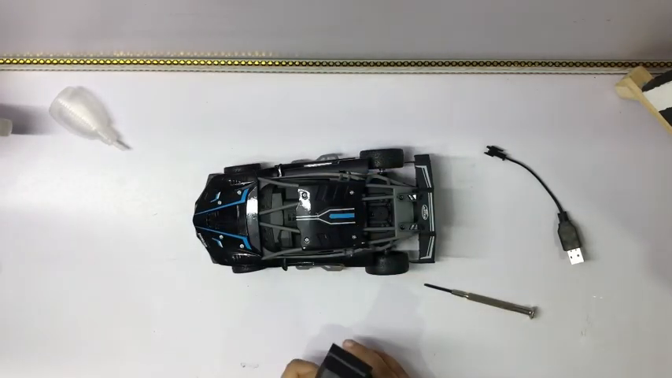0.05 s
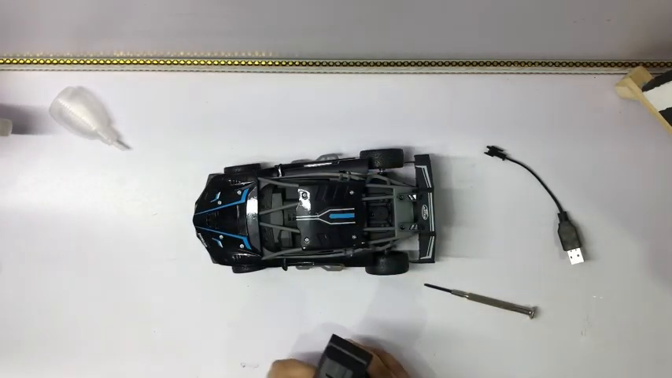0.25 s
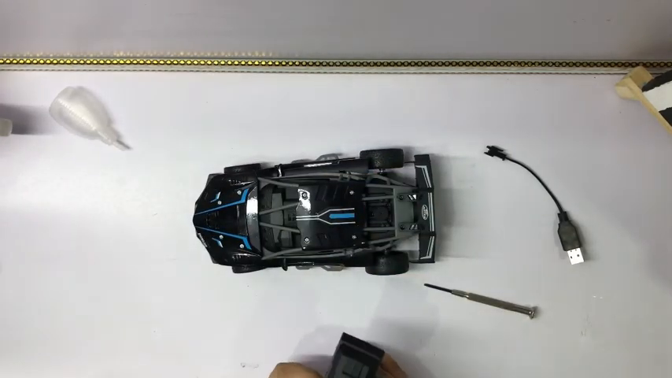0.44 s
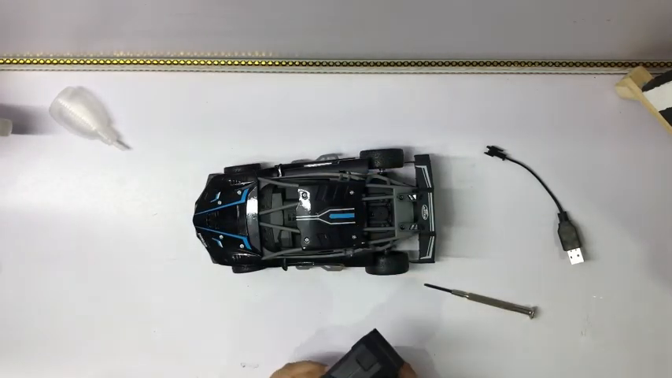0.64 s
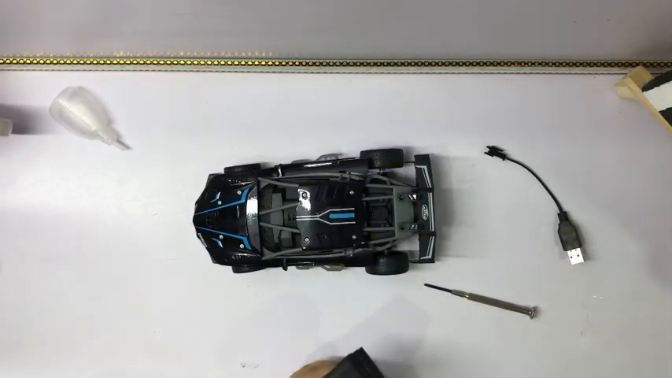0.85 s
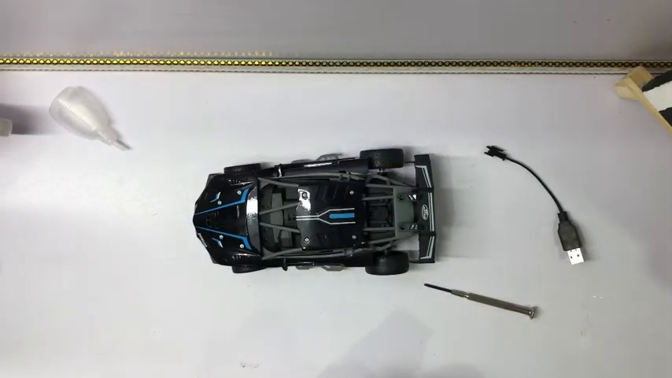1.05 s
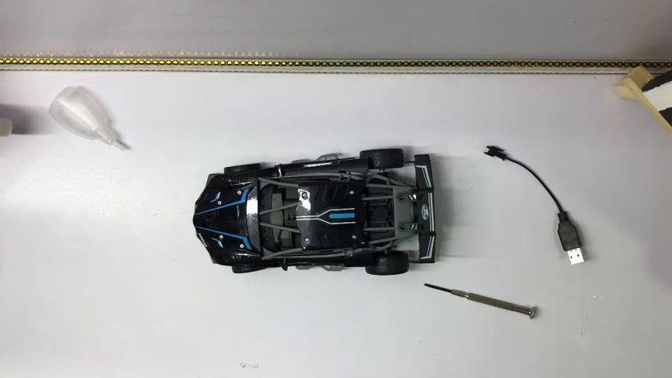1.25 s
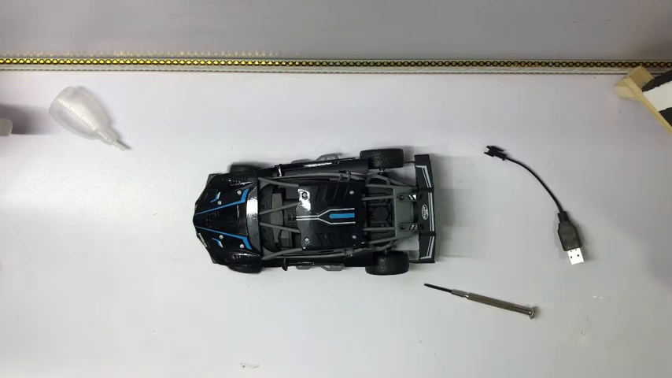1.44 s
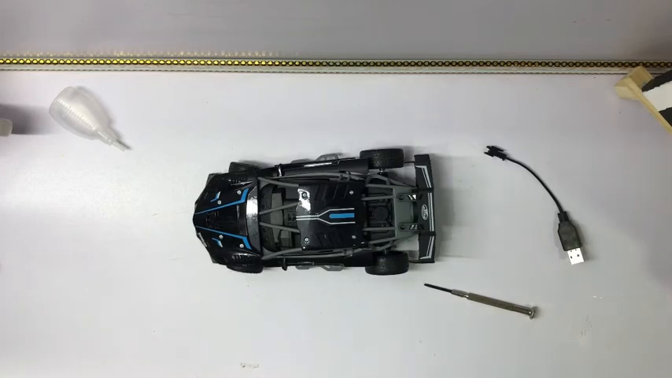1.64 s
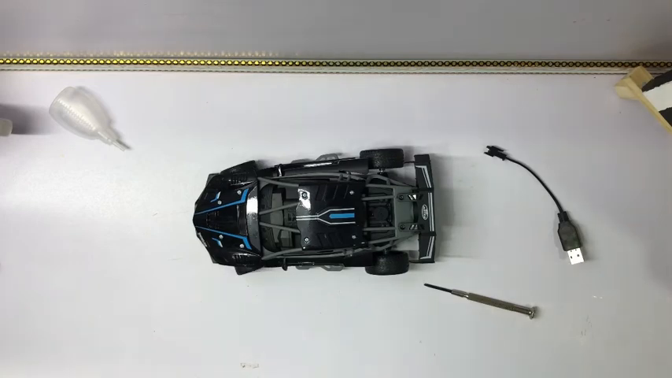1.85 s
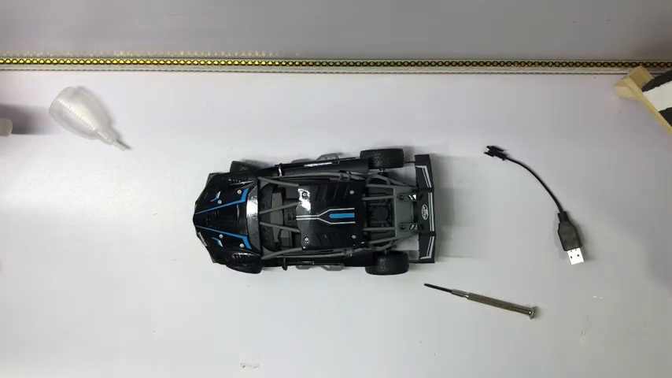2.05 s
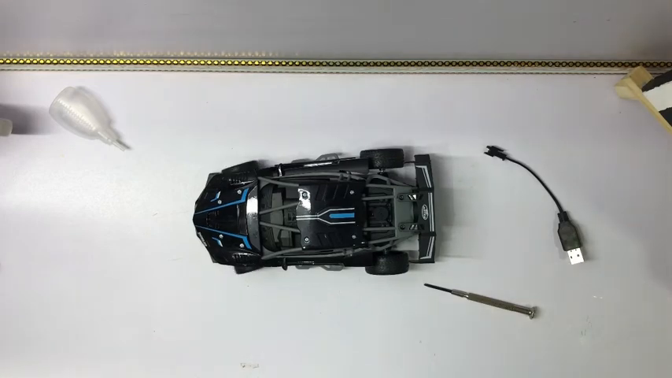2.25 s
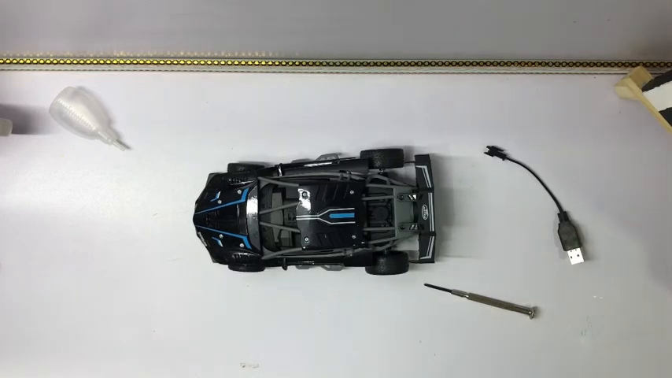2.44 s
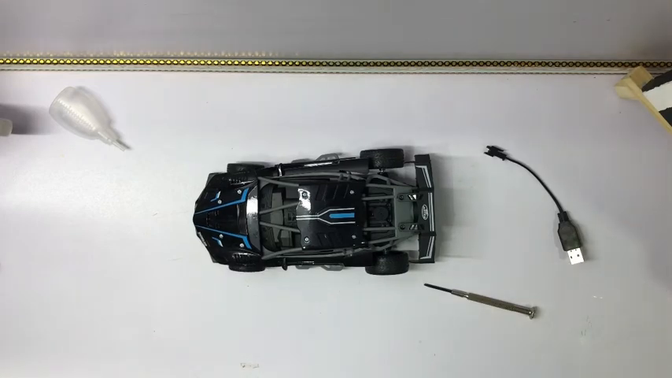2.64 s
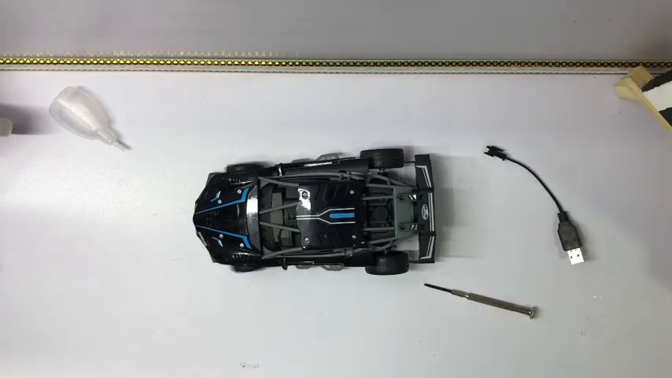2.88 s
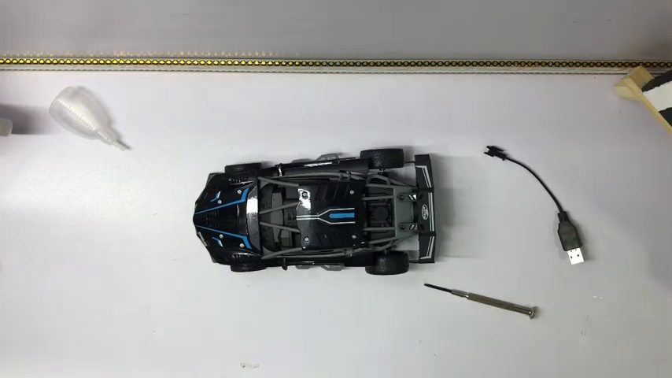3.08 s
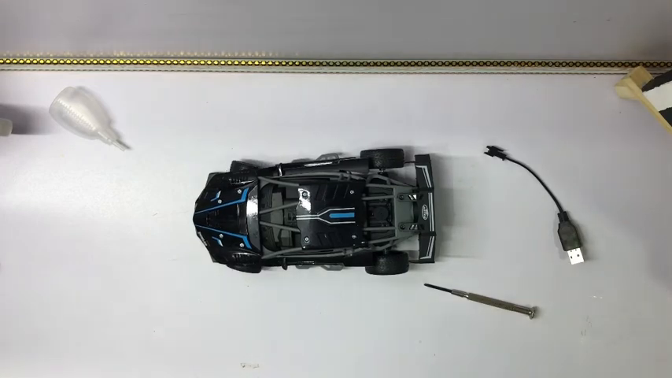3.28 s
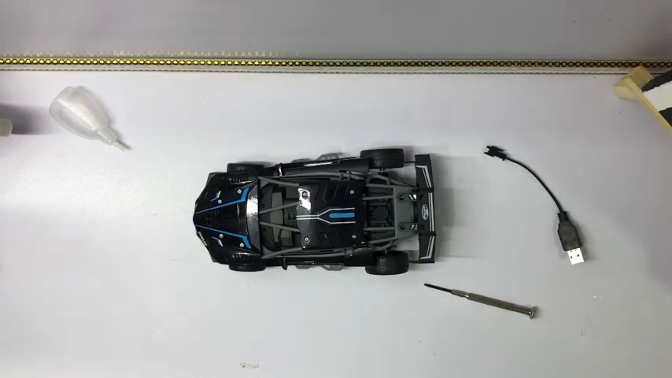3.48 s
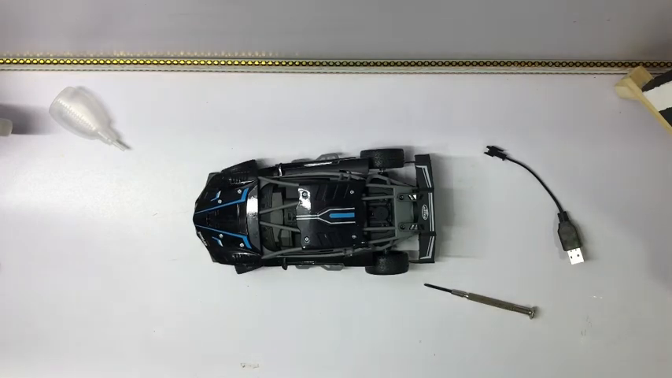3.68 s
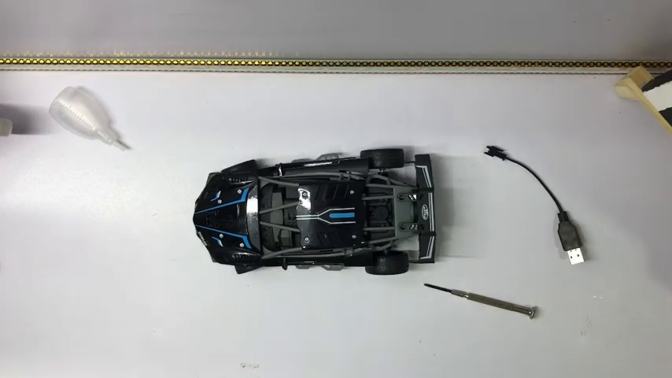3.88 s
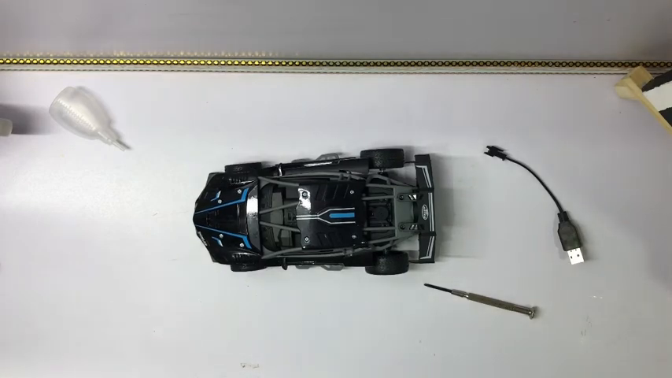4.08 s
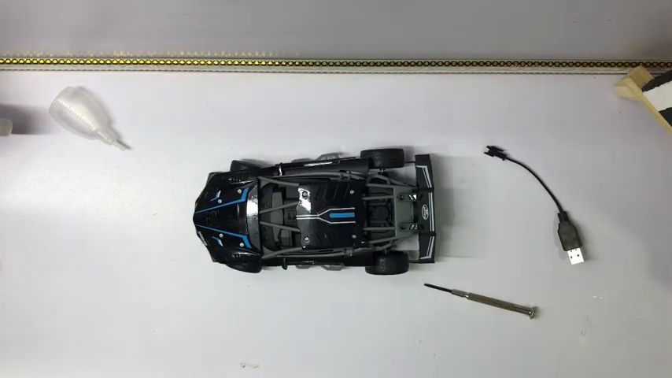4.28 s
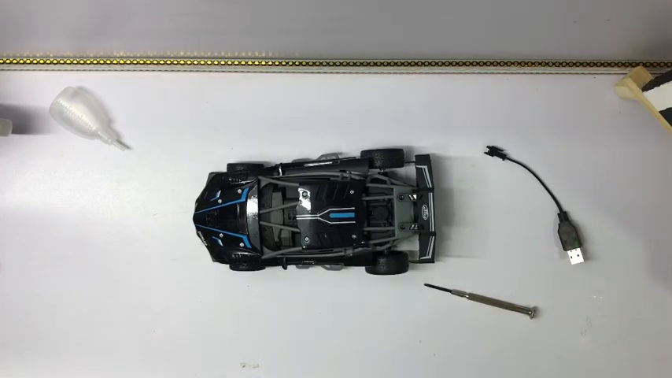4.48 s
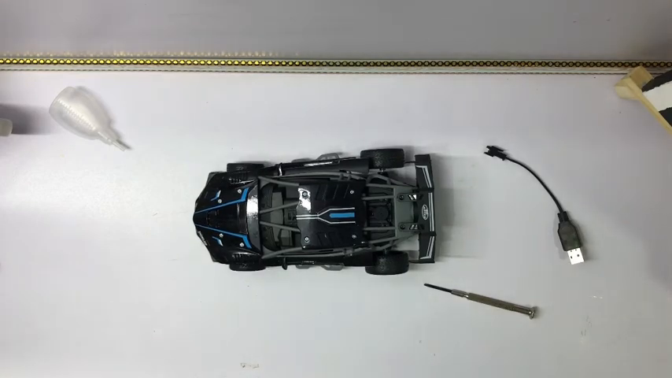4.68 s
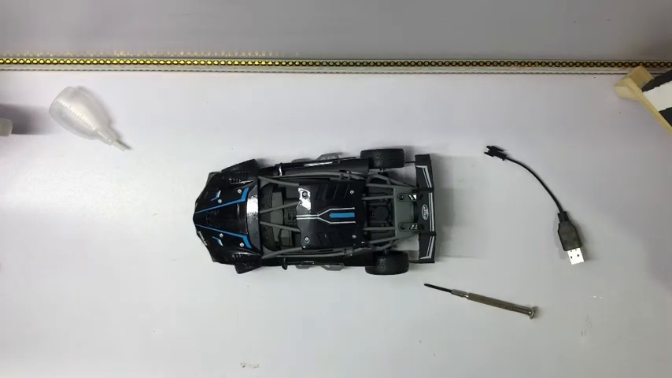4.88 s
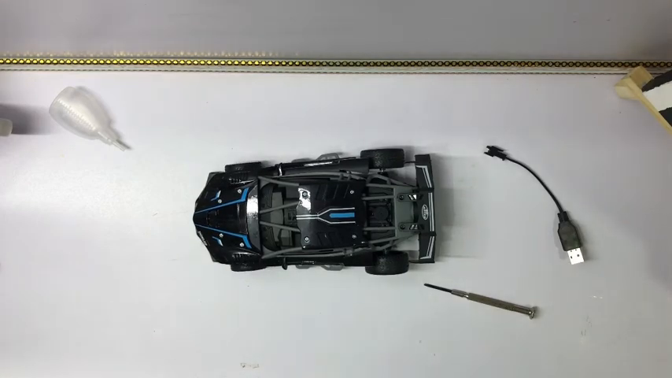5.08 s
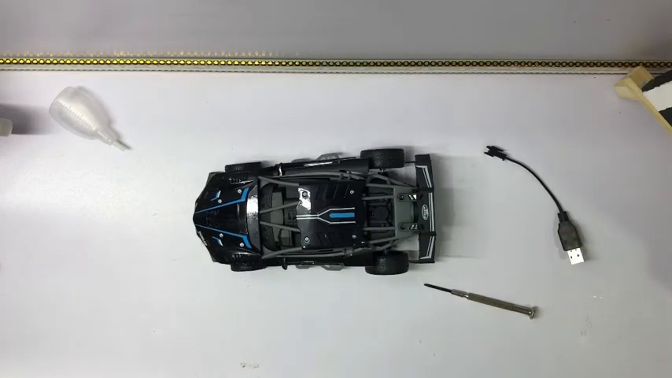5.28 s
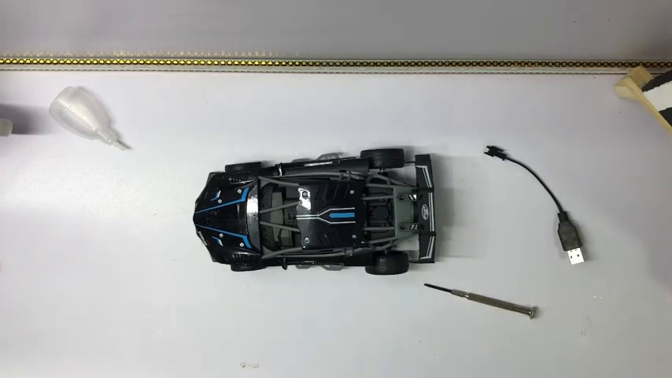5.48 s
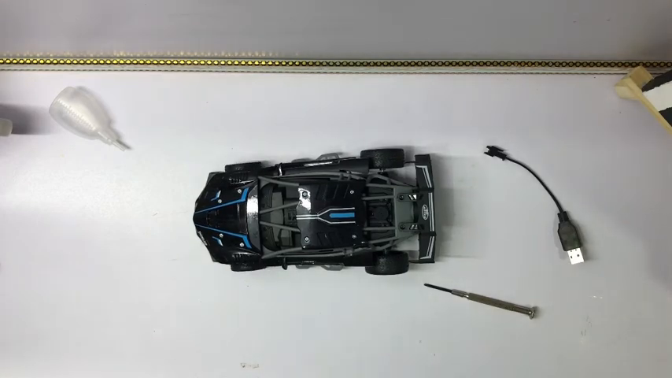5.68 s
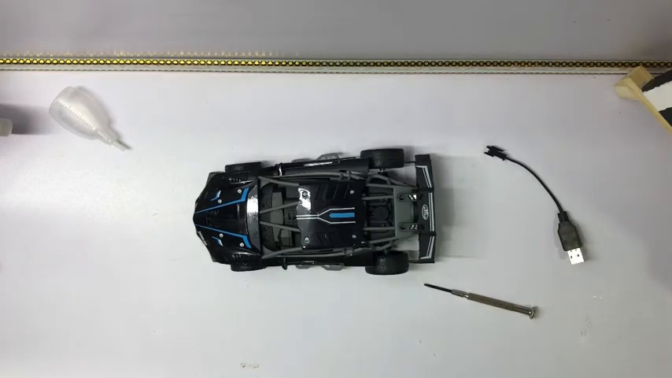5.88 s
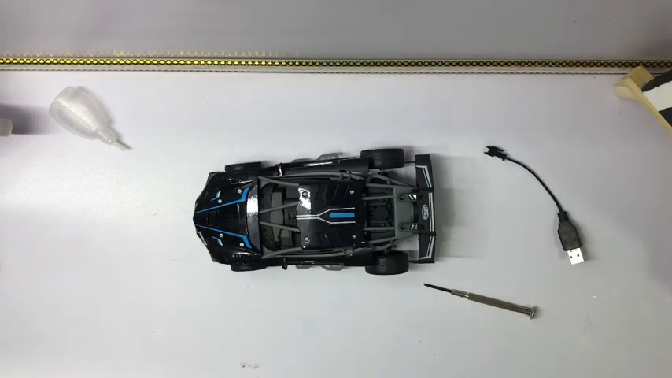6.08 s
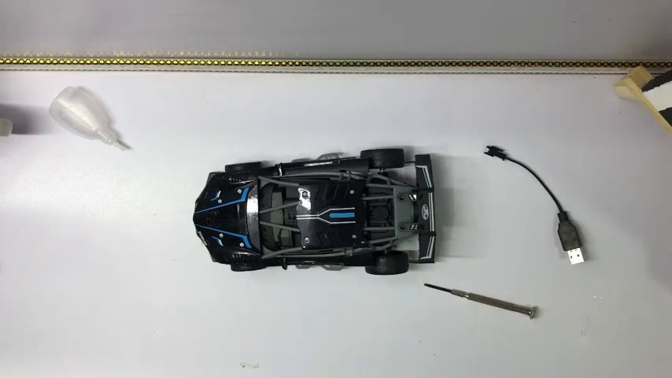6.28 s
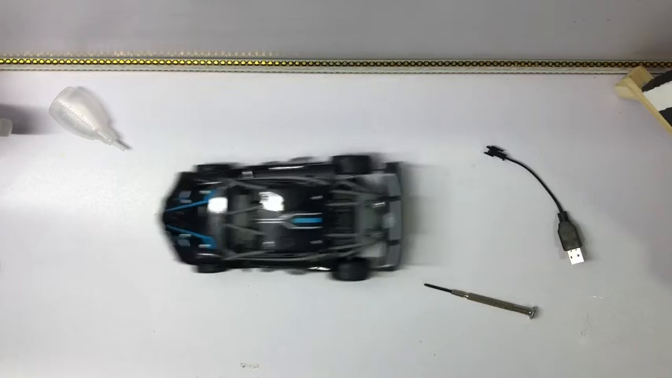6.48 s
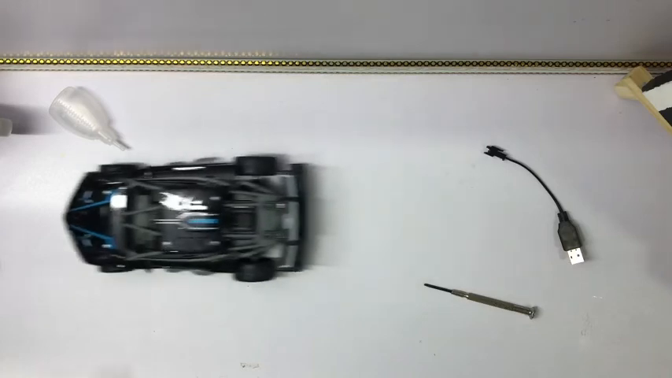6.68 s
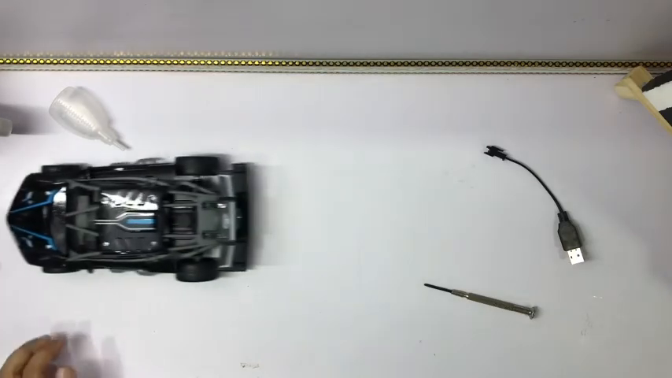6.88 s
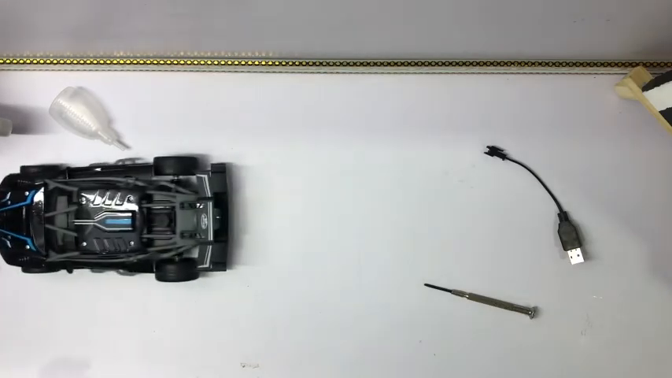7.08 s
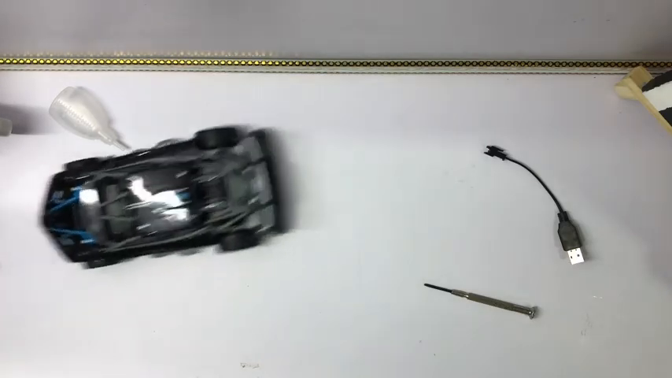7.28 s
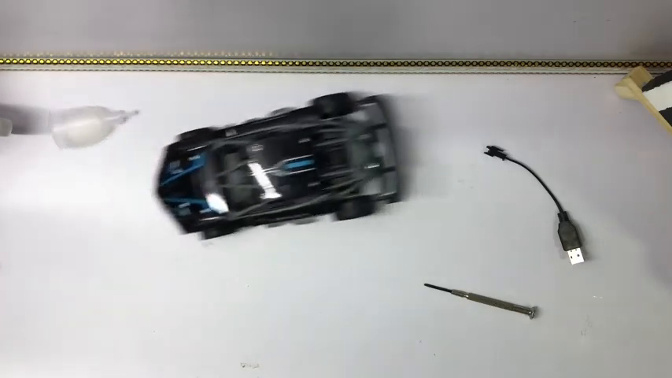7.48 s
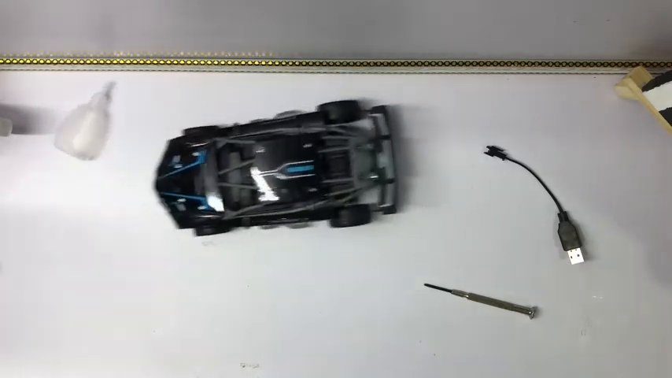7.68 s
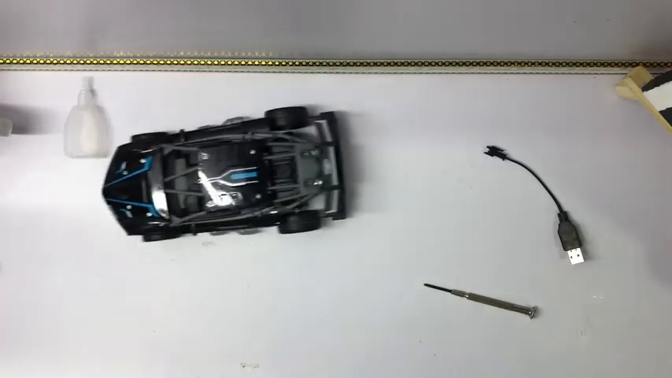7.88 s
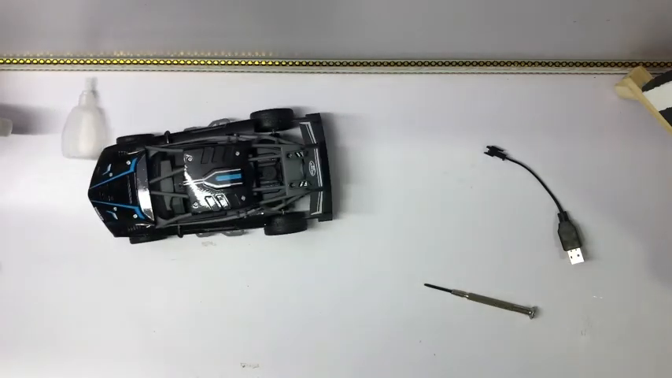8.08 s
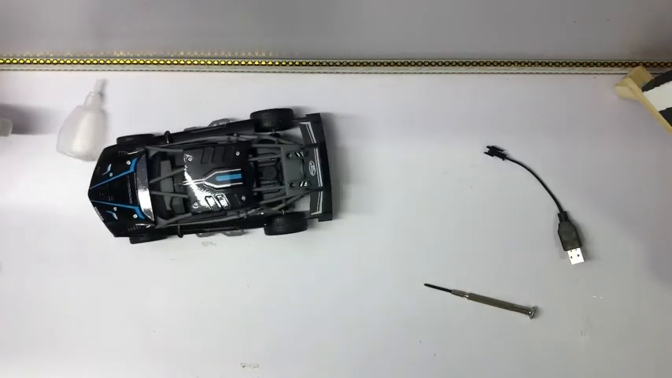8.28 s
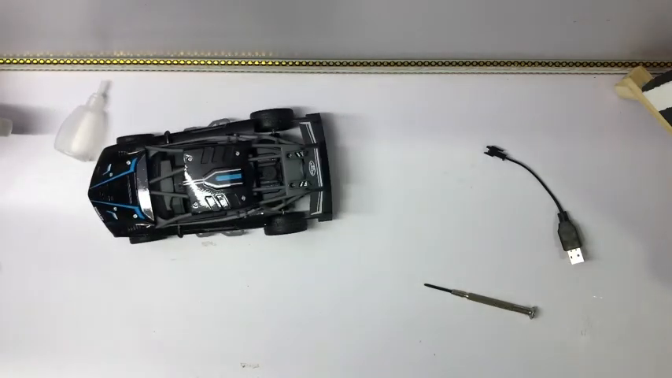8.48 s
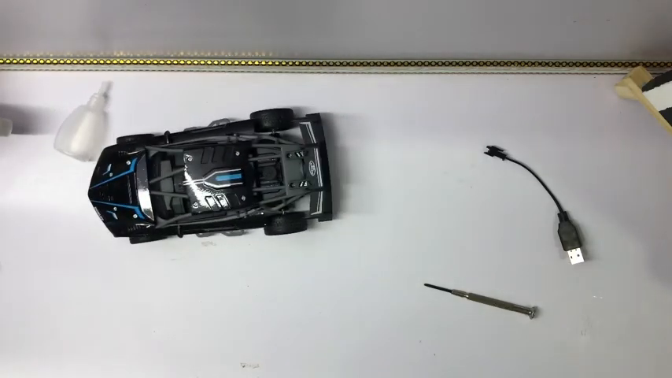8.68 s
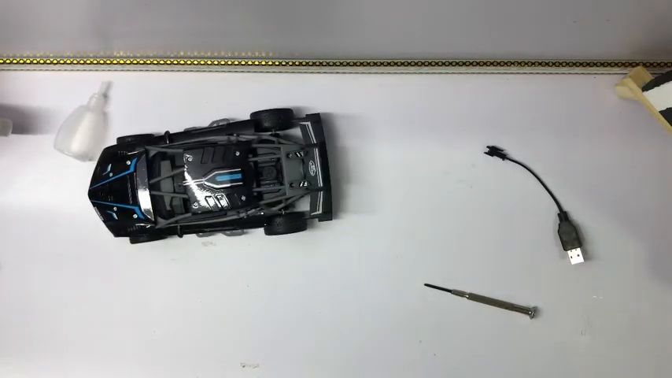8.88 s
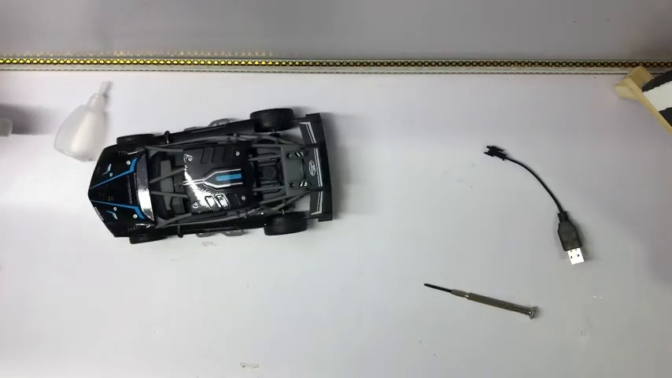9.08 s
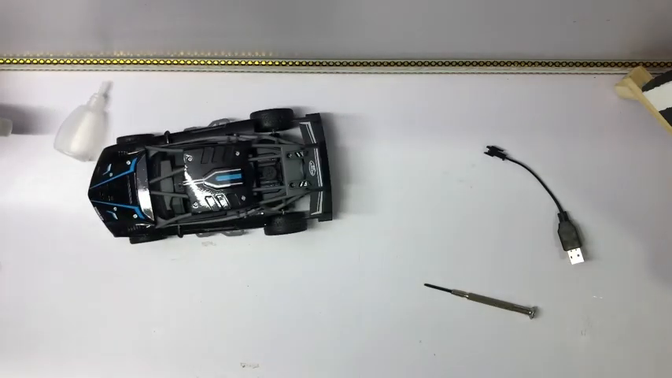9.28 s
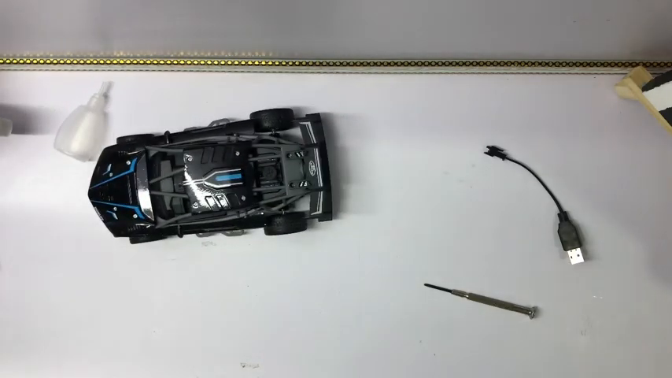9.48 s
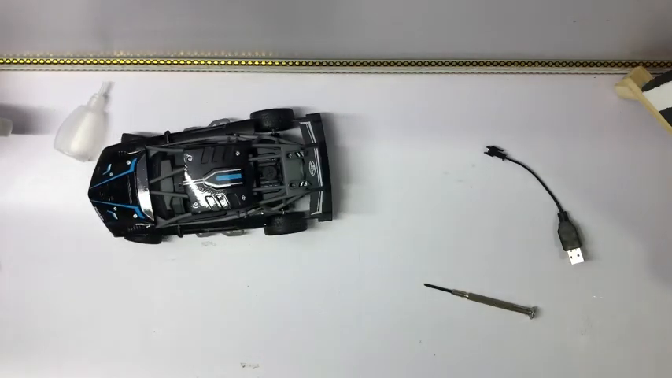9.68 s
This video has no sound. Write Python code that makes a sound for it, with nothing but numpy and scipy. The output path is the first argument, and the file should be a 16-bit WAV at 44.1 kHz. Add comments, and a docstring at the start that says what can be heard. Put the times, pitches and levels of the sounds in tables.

```python
"""In a quiet room, on a hollow tabletop, sits a plastic toy car, heard from above.
Buttons click on the hand control as short bursts of grit that ring small patches of shell.
The steering rack snaps loose and slams into its end stop, ringing chassis and table.
The drive motor grinds in three spurts, its uneven tooth strikes feeding resonances, then the car coasts.
Room tone, faint rings, creaks, rubbing skin and bumps of the table edge lie behind."""
import sys
import numpy as np
from scipy import signal
from scipy.fft import rfft, irfft, next_fast_len
from scipy.io import wavfile
from scipy.ndimage import uniform_filter1d

SR = 44100
rng = np.random.default_rng(int(sys.argv[2]) if len(sys.argv) > 2 else 0)


def log_audio(samples):
    """Write samples as a 16-bit WAV file to the path given in sys.argv[1]."""
    # one column per channel
    frames = np.atleast_2d(samples).T
    # limit to full scale, then quantise
    limited = np.clip(frames, -1, 1)
    pcm = np.round(limited * 32767).astype(np.int16)
    wavfile.write(sys.argv[1], SR, pcm)


N = 429534  # length in samples


def gain_of(db):
    """Turns decibels into a plain multiplier."""
    return 10 ** (np.asarray(db) / 20)


def evened(x):
    """Scales a sound to unit rms, so that a level set later means what it says."""
    return x / np.sqrt(np.mean(x ** 2) + 1e-20)


def drift(size):
    """Slow chance of roughly unit rms, changing over about size samples."""
    steps = rng.standard_normal(N // size + 2)
    return 1.4 * np.interp(np.arange(N) / size, np.arange(len(steps)), steps)


def read_curve(points, hz):
    """Reads a table against pitch, on a log frequency axis."""
    f, value = np.transpose(points)
    return np.interp(np.log(hz + 1), np.log(f + 1), value)


def coloured(x, points):
    """Filters x by the spectrum in a table, then scales it to unit rms."""
    size = next_fast_len(N)
    gains = gain_of(read_curve(points, np.fft.rfftfreq(size, 1 / SR)))
    return evened(irfft(rfft(x, size) * gains, size)[:N])


def gritty(spread_db, per_s):
    """Dense tiny impacts of uneven size, at random moments."""
    size = gain_of(spread_db * np.minimum(rng.exponential(1, N), 4))
    size = size * rng.choice([-1., 1.], N)
    return evened(size * (rng.random(N) < per_s / SR))


def ring(x, hz, t60):
    """One ringing mode: a unit click sets it off with a peak near 1, dying by 60 dB in t60 seconds."""
    shrink = np.exp(-np.log(1000) / t60 / SR)
    turn = 2 * np.pi * hz / SR
    return signal.lfilter([0, shrink * np.sin(turn)], [1, -2 * shrink * np.cos(turn), shrink ** 2], x)


def body(x, modes, flare_db=None, damp=1):
    """All modes of one object struck by x; moving contact points can feed each mode unevenly."""
    total = 0
    for hz, db, t60 in modes:
        feed = 1 if flare_db is None else gain_of(flare_db * drift(600))
        total = total + gain_of(db) * ring(x * feed, hz, t60 * damp)
    return total


def fade(s, db, decay_s, rise_s):
    """One quick rise and exponential fall for each event, cut off after a sixth of a second."""
    out, t = np.zeros(N + SR), np.arange(SR // 6) / SR
    for at, gain, fall, rise in np.broadcast(s, gain_of(db), decay_s, rise_s):
        shape = (1 - np.exp(-t / max(rise, 1e-5))) * np.exp(-t / max(fall, 1e-4))
        out[round(at * SR):][:len(t)] += gain * shape
    return out[:N]


def follow(spans, column, outside):
    """Draws one column of some time tables at every sample, slightly smoothed."""
    t, out = np.arange(N) / SR, np.full(N, float(outside))
    for rows in map(np.array, spans):
        inside = (t >= rows[0, 0]) & (t <= rows[-1, 0])
        out[inside] = np.interp(t[inside], rows[:, 0], rows[:, column])
    return uniform_filter1d(out, size=400)


def unbassed(x, hz):
    """A small panel radiates little below its modes, so the bass is cut."""
    return signal.sosfilt(signal.butter(2, hz, "high", fs=SR, output="sos"), x)


def slide(x, hz, width_hz):
    """A resonance that follows the pitch curve hz, unit rms."""
    bend = np.exp(2j * np.pi * np.cumsum(hz) / SR)
    steady = signal.lfilter([1], [1, -np.exp(-np.pi * width_hz / SR)], x / bend)
    return evened((bend * steady).real)


# colour of the low room tone: [f/Hz, level/dB]
LOW_ROOM_TONE = [(15, -47), (25, -17), (54, -6), (70, -62), (85, -4), (135, 1), (162, -9), (189, -4),
                 (226, -14), (308, -10), (430, -18), (700, -24.5), (910, -54), (1540, -120)]
# colour of the upper room tone and hiss: [f/Hz, level/dB]
ROOM_HISS = [(500, -54), (700, -3.5), (1200, -4), (2500, -12.5), (4200, -17.5), (4900, -25), (5400, -20),
             (7200, -25.5), (8000, -25.5), (10500, -29), (12000, -24.5), (14000, -23.5), (16500, -26)]
LOW_TONE_DB, HISS_DB = -47, -58  # average levels, before the drift
WHINE_HZ, WHINE_DB, WHINE_T60_S = 603, -67.5, 0.4


def hush():
    """Filtered noise: low room tone that swells a little, a steadier hiss and a faint narrow whine."""
    low = coloured(rng.standard_normal(N), LOW_ROOM_TONE) * gain_of(LOW_TONE_DB + 1.2 * drift(5000))
    whine = gain_of(WHINE_DB) * evened(ring(rng.standard_normal(N), WHINE_HZ, WHINE_T60_S))
    hiss = coloured(rng.standard_normal(N), ROOM_HISS) * gain_of(HISS_DB + 0.9 * drift(3000))
    return low + whine + hiss


# how long the room echoes at each pitch: [f/Hz, time to fall by 60 dB/s]
ROOM_ECHO = [(200, 0.44), (1000, 0.34), (3000, 0.58), (8000, 0.4), (15000, 0.33)]


def room(x):
    """Sparse echoes of random sign, each band dying at its own speed; three tails take turns."""
    out, turn = np.zeros(N), np.arange(N) / SR * 2 * np.pi * 19.3  # 19.3 rounds a second
    for k in range(3):
        taps = np.zeros(SR // 2)
        at = np.arange(200, len(taps) - 20, 20)
        taps[at + rng.integers(0, 20, len(at))] = rng.choice([-1., 1.], len(at))
        hz, t, bands = signal.stft(taps, SR, nperseg=256)
        dying = gain_of(-60 * t / read_curve(ROOM_ECHO, hz)[:, None])
        tail = signal.istft(bands * dying, SR, nperseg=256)[1]
        share = np.sqrt(2 / 3) * np.cos(turn + 2 * np.pi * k / 3)
        out += signal.fftconvolve(x * share, tail / np.linalg.norm(tail))[:N]
    return out


# faint thin rings: [t/s, level/dB, f/Hz, fall time (60 dB)/s]
FAINT_RINGS = [(5.17, -65.5, 5370, 0.96), (5.515, -57, 7140, .2)]


def pings():
    """Thin fuzzy rings: narrow bands of noise that die away."""
    noise, total = rng.standard_normal(N), 0
    for s, db, hz, t60 in FAINT_RINGS:
        total = total + fade(s, db, t60 / np.log(1000), .004) * evened(ring(noise, hz, 0.014))
    return total


# colour of clattering plastic, also used for clicks and steering: [f/Hz, level/dB]
PLASTIC_CLATTER = [(300, -74), (500, -24.5), (800, -11), (1000, 3), (1250, 7.5), (1600, -2), (2000, 8.5),
                   (2400, -0.5), (3000, -35), (3600, -40.5)]
CREAKS_PER_S, CREAK_DB = 3.0, -60  # average rate and smallest level
SCRAPE_S = 0.0069  # decay time of creaks and of the scrape after each click


def creaks():
    """Faint creaks of the held plastic: short puffs of grit at random moments."""
    when, size = rng.random((60, 2)).T
    s = np.cumsum(-np.log(when)) / CREAKS_PER_S
    heard = s < N / SR
    puffs = fade(s[heard], CREAK_DB + 9.2 * size[heard], SCRAPE_S, .001)
    return puffs * coloured(gritty(1.1, 8700), PLASTIC_CLATTER)


# hands shifting on plastic: [middle t/s, half length/s, level/dB, bright part above it/dB]
HAND_RUBS = [(.23, 0.053, -69.5, -12.5), (0.54, 0.092, -72, -2), (0.83, 0.1, -65, -6),
             (1.046, 0.073, -66.5, 7), (1.17, .05, -63, -22), (1.385, .025, -61, -7),
             (3.963, 0.03, -62, -31), (4.014, 0.017, -50, -11), (4.499, 0.018, -49.5, -9),
             (5.11, 0.03, -50.5, -10), (5.38, .05, -61.5, -3), (5.53, .06, -66.5, -5),
             (8.56, 0.15, -66.5, -7)]
# colour of skin on plastic: [f/Hz, level/dB]
SKIN_COLOUR = [(800, -21), (2000, 5.5), (3000, 4), (4300, 6), (5000, -0.5), (7000, 1), (8500, -61)]
# bright edge, also used for clicks and steering: [f/Hz, level/dB]
BRIGHT_SIZZLE = [(4120, -13), (7000, -2.5), (8320, 0), (10900, -2), (15400, -8), (16100, 4), (16500, -37)]
RUB_FALL_DB = 16.5  # fall of a rub at its half length


def rustle():
    """Skin sliding on plastic: a thin scratch with a bright edge, swelling and fading."""
    scratch, t = gritty(1.5, 12000), np.arange(N) / SR
    plain, bright = np.zeros(N), np.zeros(N)
    for s, half, db, bright_db in HAND_RUBS:
        rub = gain_of(db - RUB_FALL_DB * ((t - s) / half) ** 2)
        plain += rub
        bright += rub * gain_of(bright_db)
    return plain * coloured(scratch, SKIN_COLOUR) + bright * coloured(scratch, BRIGHT_SIZZLE)


# hand and control bump the table edge: [t/s, relative level/dB]
EDGE_BUMPS = [(.0325, -18.5), (1.014, -39), (1.046, -48), (1.146, -41), (8.826, -40.5)]
# modes of the table edge: [f/Hz, level/dB, fall time (60 dB)/s]
TABLE_EDGE = [(155, 0, 0.089), (309, 2.5, 0.075), (225, -4, 0.03), (544, -10, 0.025), (1120, -16, 0.016),
              (2940, -15, 0.015)]
# colour of the dull clatter: [f/Hz, level/dB]
DULL_CLATTER = [(400, -1.5), (800, -6), (1300, -3.5), (2000, -10), (2900, -13.5), (4000, -21.5),
                (8000, -35), (16000, -33)]


def thud():
    """A tick, then the soft weight of the hand, ring the table edge, with a dull clatter."""
    s, db = np.transpose(EDGE_BUMPS)
    tick = fade(s, db - 26, 0.000095, .00005)
    weight = fade(s + 0.0028, db - 18.5, 0.00043, 0.00032)
    clatter = fade(s - .001, db - 6.5, 0.0059, 0.0014) * coloured(rng.standard_normal(N), DULL_CLATTER)
    return unbassed(body(tick - weight, TABLE_EDGE), 105) + clatter


# buttons, small creaks and ticks of plastic:
# [t/s, relative level/dB, f/Hz, sizzle above click/dB, shell clatter above click/dB]
BUTTON_CLICKS = [(1.026, -44, 1250, -30, -19), (1.1494, -41, 4120, -24, -26), (1.2486, -42, 1670, -18, -17),
                 (1.268, -32, 1430, -17, -4.5), (1.334, -32.5, 1890, -30, -22),
                 (1.3844, -41, 3340, -8, -16), (1.4423, -28, 4200, -6, -17), (1.6616, -30, 1870, -11, -15),
                 (1.714, -29, 4800, 5, -16), (1.954, -36.5, 2420, 5, -17), (1.9723, -32.5, 2400, 2, -13),
                 (1.9913, -22.5, 2460, 1.5, -19), (2.1844, -30, 3830, 0, -25), (2.3125, -25, 2030, 1, -22),
                 (2.523, -35, 2760, -7, -20), (2.8882, -25, 2120, 1, -35), (3.042, -36, 3500, 2, -7),
                 (3.1198, -39, 2200, 1, -10), (3.2103, -33, 4470, -11, -11), (3.4426, -38.5, 2180, 0, -4),
                 (3.5162, -28.5, 2260, -13, -13), (3.6083, -27, 4200, -2, -17),
                 (3.9318, -37.5, 2280, 6.5, -4.5), (3.9978, -31, 2300, -6, -16),
                 (4.179, -42, 4300, -16, -3), (4.419, -36, 2060, 1, -15), (4.4882, -36, 1990, -9, -9),
                 (4.8384, -26.5, 4170, -2, -18), (5.028, -35, 2080, 0, -5), (5.0953, -34.5, 2260, -3, -11),
                 (5.6991, -31, 1150, -26, -6), (5.9449, -38, 1900, -1, -17), (6.0615, -41, 2000, -24, -9),
                 (6.3598, -24, 2250, -17, -35), (6.617, -34, 4000, -2, -20), (6.6594, -29, 1940, -5, -19),
                 (6.7662, -29.5, 2360, -17, -13), (6.8594, -32.5, 2020, -13, -13),
                 (6.9594, -36.5, 2070, -9, -6), (7.0888, -40, 6440, -9, -25), (7.106, -21.5, 1796, -4, -30),
                 (7.4997, -23.5, 2280, -10, -17), (7.9775, -35, 1670, -18, -15), (7.999, -36, 988, -30, -5),
                 (8.0182, -40, 1694, -11, -20), (8.3664, -34, 1950, -38, -8), (8.8408, -45, 1860, -31, -2),
                 (9.3153, -36.5, 3870, -4.5, -8), (9.3508, -39, 2860, -26, -14),
                 (9.542, -25, 2080, -17, -16), (9.614, -25.5, 2370, -11, -33)]
# colour of the button scrape: [f/Hz, level/dB]
BUTTON_SNAP = [(900, -31), (1500, -35), (2500, 4), (4500, 2.5), (7000, -9), (9000, -43)]


def clicks():
    """Each click: a burst of grit rings a small patch of shell at its own pitch, then a short scrape."""
    rung, t = np.zeros(N + SR), np.arange(1500) / SR
    bursts = rng.standard_normal((len(BUTTON_CLICKS), len(t))) * np.exp(-t / 0.0042)
    for (s, db, hz, *_), burst in zip(BUTTON_CLICKS, bursts):
        patch = ring(burst, hz, .008) + .6 * ring(burst, 1.45 * hz, .004)
        rung[round(s * SR):][:len(t)] += gain_of(db - 5) * patch / abs(patch).max()
    s, db, _, sizzle_db, shell_db = np.transpose(BUTTON_CLICKS)
    noise = gritty(1.1, 8000)
    snap = fade(s, db - 17, SCRAPE_S, 0.00023) * coloured(noise, BUTTON_SNAP)
    shell = fade(s, db + shell_db, SCRAPE_S, 0.0014) * coloured(noise, PLASTIC_CLATTER)
    sizzle = fade(s, db + sizzle_db - 10, 0.0024, 0.00014) * coloured(noise, BRIGHT_SIZZLE)
    return rung[:N] + snap + shell + sizzle


# modes of the hollow tabletop, before damping: [f/Hz, level/dB, fall time (60 dB)/s]
TABLE_MODES = [(58.8, -21, 0.98), (186.06, 15, 0.33), (257.5, 4.5, 0.078), (310.6, 8.5, 0.11),
               (444.5, -6.5, 0.33)]


def table_thump(s, felt, boom_db, knock_db):
    """The tyres shove the table softly and the car rocks back; the whole table sways more slowly."""
    shove = fade(felt + 0.0022, boom_db - 30.0, 0.00058, 0.00026)
    rock = fade(felt + 0.00459, knock_db - 28.5, 0.0013, 0.00037)
    rock = rock + fade(felt + 0.00847, knock_db - 38.0, 0.00077, 0.0002)
    thump = body(shove, TABLE_MODES[1:2]) + body(rock, TABLE_MODES[2:])
    sway = body(fade(s, boom_db - 31.5, 0.0033, 0.0022), TABLE_MODES[:1])
    return sway, unbassed(uniform_filter1d(thump, size=60), 158)


# modes of the car's chassis, before damping: [f/Hz, level/dB, fall time (60 dB)/s]
CHASSIS_MODES = [(756, -4, 0.03), (831, -9.5, 0.26), (1017, -9.5, 0.18), (1064, -11, 0.21),
                 (1237, -3.5, 0.19), (1288, -2, 0.087), (1720, -22, 0.16), (1961, -7, 0.1),
                 (2270, -31, 0.19), (2267, -0.5, 0.086)]


def chassis_ring(s, chassis_db):
    """A gritty blow, a sharp tick and the chattering shell ring the chassis."""
    blow = fade(s, chassis_db - 18.5, 0.0038, 0.0027)
    chatter = fade(s + 0.0075, chassis_db - 28.5, 0.01, 0.0034)
    tick = np.diff(fade(s, chassis_db - 17, 0.00055, .0001), prepend=0)
    return body((blow + chatter) * gritty(2.1, 5000) + tick, CHASSIS_MODES, 3.27, damp=0.41)


# colour of the sharp crack: [f/Hz, level/dB]
CRACK_COLOUR = [(500, -30), (900, -9), (1500, -5.5), (2200, -2), (4500, 0.5), (7000, -5.5), (9000, -84)]


def crack_and_rattle(s, crack_db, sizzle_db, chassis_db, rise_s, rattle_s):
    """Grit in a sharp crack with a bright sizzle, then loose parts rattling."""
    grit = gritty(2.0, 12000)
    crack = fade(s, crack_db - 7.0, 0.00097, rise_s) + fade(s, crack_db - 13.5, rattle_s, 0.0029)
    bright_db = crack_db + sizzle_db
    sizzle = fade(s, bright_db + 1.5, 0.0022, rise_s) + fade(s, bright_db - 10.5, rattle_s, 0.0012)
    crunch = fade(s, chassis_db - 0.5, 0.91 * rattle_s, 0.0048)
    crunch = crunch * coloured(gritty(6.5, 3000), PLASTIC_CLATTER)
    return crack * coloured(grit, CRACK_COLOUR) + sizzle * coloured(grit, BRIGHT_SIZZLE) + crunch


# steering swings; the rack snaps loose, travels and slams into its stop (levels are relative):
# [snap t/s, snap rise/s, travel/s, snap level/dB, slam level/dB, slam crack above slam/dB,
#  tabletop boom level/dB, tabletop knock level/dB]
STEERING_SWINGS = [(1.4718, 0.0014, 0.018, -12.5, -24, 7.5, -29.5, -23.5),
                   (1.743, 0.00024, 0.021, -16.5, -20.5, 8, -31.5, -24),
                   (2.016, 0.0036, .0182, -14, -17.5, 3, -23.5, -23),
                   (2.2154, 0.00046, 0.019, -16, -19, 6.5, -25.5, -25.5),
                   (2.3375, 0.00036, 0.02, -13.5, -23, -2, -29, -22),
                   (2.911, 0.00065, 0.02, -20, -17, 3, -27.5, -24),
                   (3.2333, .0005, 0.02, -17, -21.5, 9.5, -27, -22.5),
                   (3.6357, 0.00057, .0194, -18.5, -17, 4, -27, -22),
                   (4.2078, 0.0002, 0.02, -18.5, -20.5, 9, -28, -21.5),
                   (4.8712, .0005, .0188, -17, -20.5, 5.5, -26.5, -25),
                   (9.636, 0.00024, 0.019, -14.5, -22.5, 6.5, -24.5, -38)]
SLACK_S, SLACK_DB = 0.0029, -16.5  # the gears take up their slack just before the snap
SNAP_SIZZLE_DB, SLAM_SIZZLE_DB = -7.5, -8  # above the crack of each
SNAP_RING_DB = -13.5  # above the snap's crack
SNAP_BOOM_DB, SNAP_KNOCK_DB = -6.5, -7  # above the slam's boom and knock
SNAP_RATTLE_S, SLAM_RATTLE_S, SLAM_RISE_S = 0.021, 0.0078, 0.00015
SNAP_LAG_S = 0.00515  # the table feels the snap late, as the car leans


def knocks():
    """Slack, snap and slam: each cracks and rattles, rings the chassis and thumps the table."""
    at, snap_rise_s, travel_s, snap_db, slam_db, sharp_db, table_db, rap_db = np.transpose(STEERING_SWINGS)
    lead_s, lead_db = np.array([[-SLACK_S], [0]]), np.array([[SLACK_DB], [0]])  # slack, then snap

    def both(lead, slam):
        """Lines up one setting for all slacks, snaps and slams."""
        return np.append(np.broadcast_to(lead, (2, len(at))), np.broadcast_to(slam, len(at)))

    s = both(at + lead_s, at + travel_s)
    crack_db = both(snap_db + lead_db, slam_db + sharp_db)
    sizzle_db = both(SNAP_SIZZLE_DB, SLAM_SIZZLE_DB)
    chassis_db = both(snap_db + lead_db + SNAP_RING_DB, slam_db)
    boom_db = both(table_db + lead_db + SNAP_BOOM_DB, table_db)
    knock_db = both(rap_db + lead_db + SNAP_KNOCK_DB, rap_db)
    rattle_s, rise_s = both(SNAP_RATTLE_S, SLAM_RATTLE_S), both(snap_rise_s, SLAM_RISE_S)
    crack = crack_and_rattle(s, crack_db, sizzle_db, chassis_db, rise_s, rattle_s)
    sway, thump = table_thump(s, s + both(SNAP_LAG_S, 0), boom_db, knock_db)
    return crack, sway + chassis_ring(s, chassis_db) + thump


def table_rumble(boom_db, knock_db):
    """The rolling tyres shake the tabletop with noise."""
    tyres = rng.standard_normal(N)
    boom = gain_of(boom_db + 1.0) * evened(body(tyres, TABLE_MODES[1:2], damp=1.0))
    sway = body(gain_of(boom_db - 20) * tyres, TABLE_MODES[:1])
    knock = gain_of(knock_db - 6) * evened(body(tyres, TABLE_MODES[2:], damp=0.98))
    return boom + sway + knock


# gear mesh under power, one table per spurt: [t/s, teeth per second/Hz, relative hum level/dB]
GEAR_MESH = [
    [(6.41, 221.5, -43), (6.448, 320, -29), (6.468, 320, -26), (6.478, 310, -19.5), (6.498, 300, -27.5),
     (6.6, 311.0, -44)],
    [(7.15, 220, -65), (7.206, 323, -46), (7.238, 376, -31.5), (7.282, 465.3, -37), (7.32, 500, -36),
     (7.356, 303, -36), (7.4, 306.3, -43)],
    [(7.55, 272, -36.5), (7.624, 268, -29), (7.65, 343, -30), (7.682, 292, -31.5), (7.708, 293, -31.5),
     (7.74, 315.0, -43)],
]


def gear_strikes():
    """Each passing tooth strikes and shakes loose a puff of grit, some teeth worse than others."""
    mesh_hz = follow(GEAR_MESH, column=1, outside=190)
    turns = np.cumsum(mesh_hz * (1 + .05 * drift(150))) / SR  # teeth passed so far
    teeth = (np.diff(np.floor(turns), prepend=0) > 0) * gain_of(2.0 * rng.standard_normal(N))
    puffs = (.45 + np.exp(-(turns % 1) / .3)) * gain_of(1.8 * drift(120))
    grit = gritty(1.73, 9000) * puffs
    return mesh_hz, turns, grit, evened(grit) + 0.15 * evened(teeth)


# overtones of the gear mesh: [multiple of tooth rate, level/dB]
HUM_OVERTONES = [(1, 1), (2, -16.5), (3, -10.5)]


def gear_hum(turns):
    """Sine tones at multiples of the tooth rate."""
    tones = sum(gain_of(db) * np.sin(2 * np.pi * k * turns) for k, db in HUM_OVERTONES)
    return gain_of(follow(GEAR_MESH, column=2, outside=-84.5) + 1.0 + 0.5 * drift(300)) * tones


# resonances of the gearbox: [f/Hz, width/Hz (sets the ring time), level/dB]
GEARBOX_MODES = [(3212, 15, 23), (3900, 120, 10), (3580, 34, 3), (4760, 29, 2.5), (6260, 82, -2),
                 (6860, 120, 24), (9100, 150, 1)]
# colour of the grinding grit: [f/Hz, level/dB]
GRIND_COLOUR = [(290, -58), (500, -53), (1290, 5.5), (1590, -10.5), (1910, 0), (2940, -9), (3740, -6),
                (5000, -15.5), (6500, -91), (11000, -120)]


def grinding(grit, strikes):
    """Raw grit mixed with the chassis and gearbox rung by the teeth, unit rms."""
    modes = [(hz, db, 3.5 / (width + 60)) for hz, width, db in GEARBOX_MODES]  # wide modes die sooner
    box = evened(body(strikes, modes, 5.0))
    chassis = evened(body(strikes, CHASSIS_MODES, 6.1, damp=1.0))
    return evened(1.06 * coloured(grit, GRIND_COLOUR) + 0.97 * chassis + 0.35 * box)


# motor effort, one table per spurt and the coasting after it: [t/s, relative grind level/dB]
MOTOR_EFFORT = [
    [(6.382, -56), (6.422, -34), (6.486, -27), (6.52, -33.5), (6.545, -36.5), (6.63, -46), (6.74, -47),
     (6.87, -52), (6.95, -61), (7.07, -58.5)],
    [(7.134, -50), (7.16, -35), (7.2, -29), (7.235, -27.5), (7.276, -29), (7.32, -27.5), (7.366, -35),
     (7.41, -40.5), (7.5, -42.5), (7.542, -46)],
    [(7.542, -52), (7.57, -35), (7.636, -27.5), (7.67, -29.5), (7.704, -41), (7.756, -54.5), (7.81, -54.5),
     (7.9, -54.5), (8.02, -56.5), (8.05, -74)],
]
# sound under power, one row per spurt: [squeal f/Hz, growl f/Hz, then levels above grind/dB:
# whizz, squeal, growl, tabletop boom, tabletop knock]
POWER_SOUND = [(4150, 1100, -6.5, -4, -14, -8, 5), (3670, 1006, -7, -7, -4, -9, -7.5),
               (4210, 1280, -12.5, -6.5, 1.5, -5, -1)]
# the same while the car coasts, a single row with the same columns [f/Hz, f/Hz, five levels/dB]
COAST_SOUND = (3848, 1273, -16, -33, 8.5, 5.5, 3.5)
# colour of the whizz: [f/Hz, level/dB]
WHIZZ_COLOUR = [(2940, -11.5), (5000, -10.5), (6990, 3), (7720, -11.5), (10100, -15), (11100, -14),
                (15100, -15), (16200, -29), (16500, -65)]
COAST_DB, POWER_DB = -40.5, -32  # grind levels between which coasting turns into full power
SQUEAL_RISE, MESH_HZ = 0.09, 332  # squeal pitch follows mesh speed by this share around MESH_HZ
WANDER = 0.05  # share by which the squeal wanders; the growl wanders twice as much
GROWL_DB_PER_HZ = 0.11  # the growl swells as the mesh speeds up under power


def drive():
    """Tooth strikes and loose grit ring the gears as grind, whizz, squeal and growl; the table rumbles."""
    mesh_hz, turns, grit, strikes = gear_strikes()
    grind_db = follow(MOTOR_EFFORT, column=1, outside=-85)
    power = np.clip((grind_db - COAST_DB) / (POWER_DB - COAST_DB), 0, 1)
    spurt = np.searchsorted([rows[0][0] * SR for rows in MOTOR_EFFORT[1:]], np.arange(N))
    blends = []  # each setting slides from coasting to power
    for coast, powered in zip(COAST_SOUND, zip(*POWER_SOUND)):
        blends.append(coast + power * (np.take(powered, spurt) - coast))
    squeal_hz, growl_hz, *above = blends
    squeal_hz = squeal_hz * (1 + SQUEAL_RISE * power * (mesh_hz / MESH_HZ - 1) + WANDER * drift(1200))
    growl_hz = growl_hz * (1 + 2 * WANDER * drift(1500))
    whizz_db, squeal_db, growl_db, boom_db, knock_db = grind_db + above

    grind = gain_of(grind_db - 0.5) * grinding(grit, strikes)
    whizz = gain_of(whizz_db + 2.0) * coloured(grit, WHIZZ_COLOUR)
    squeal = gain_of(squeal_db - 1.5 + 2.4 * drift(500)) * slide(strikes, squeal_hz, 204)
    # overtone and growl fall away faster than the grind when the car only coasts
    overtone_db = whizz_db - 20.0 + .5 * np.minimum(grind_db + 49, 0) + 6.8 * drift(400)
    overtone = gain_of(overtone_db) * slide(strikes, 1.935 * squeal_hz.clip(0, 3850), 150)
    growl_db = growl_db - 12 + GROWL_DB_PER_HZ * power * (mesh_hz - MESH_HZ)
    growl_db = growl_db + 2.8 * drift(1500) + .5 * np.minimum(grind_db + 41, 0)
    growl = gain_of(growl_db) * slide(strikes, growl_hz, 92)
    gears = grind + whizz + squeal + overtone + growl
    return gears + table_rumble(boom_db, knock_db) + gear_hum(turns)


def scene():
    """Car and hand control, their echoes in the room, and the room tone."""
    crack, ringing = knocks()
    motor = drive()
    hand = clicks() + creaks() + rustle() + thud() + pings()
    wet = gain_of(-11.5) * (crack + motor) + gain_of(-16) * ringing + gain_of(-8.5) * hand
    return (crack + ringing + motor + hand + room(wet) + hush())[None]


def record(dry):
    """The deepest bass is cut; the treble dips above 15.6 kHz and ends near 16.85 kHz."""
    dry = signal.sosfilt(signal.butter(4, 42, "high", fs=SR, output="sos"), dry)
    shelf = signal.firwin2(255, [0, 15600, 15900, SR / 2], [0.89, 0.58, 0.063, .12], fs=SR)
    edge = signal.firwin(511, 16850, window=("kaiser", 9), fs=SR)
    return signal.oaconvolve(dry, np.convolve(shelf, edge)[None], "same")


dry = scene()
out = record(dry)
log_audio(out)
```